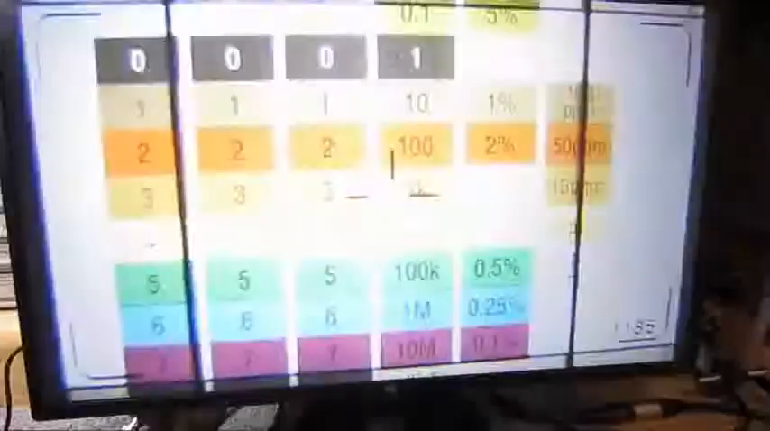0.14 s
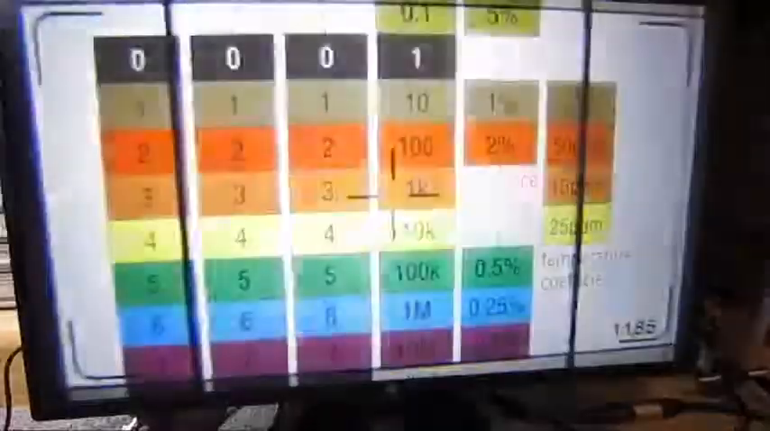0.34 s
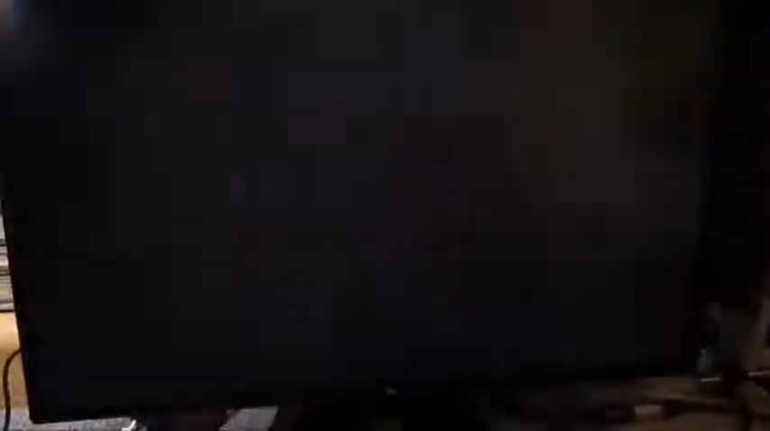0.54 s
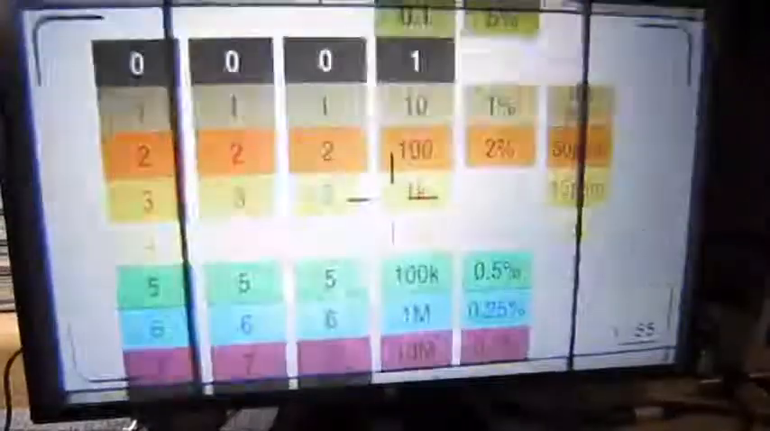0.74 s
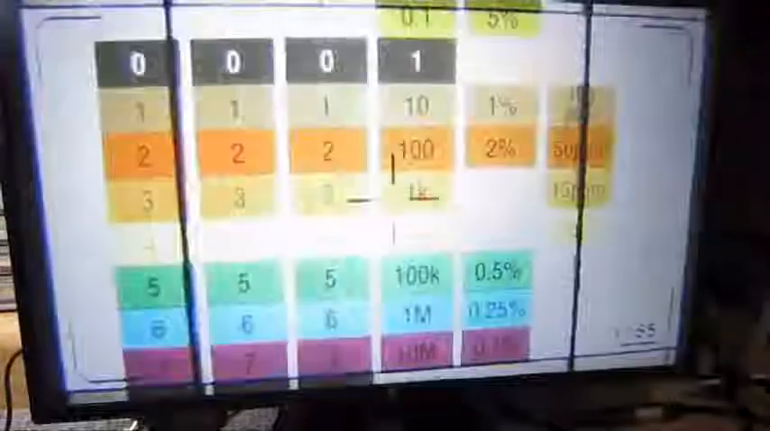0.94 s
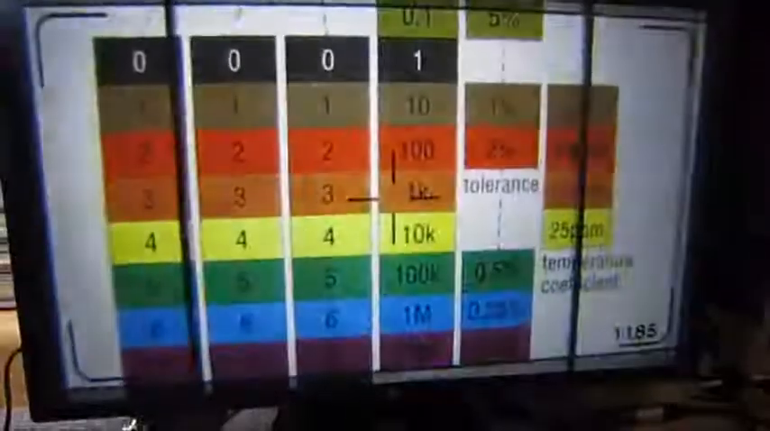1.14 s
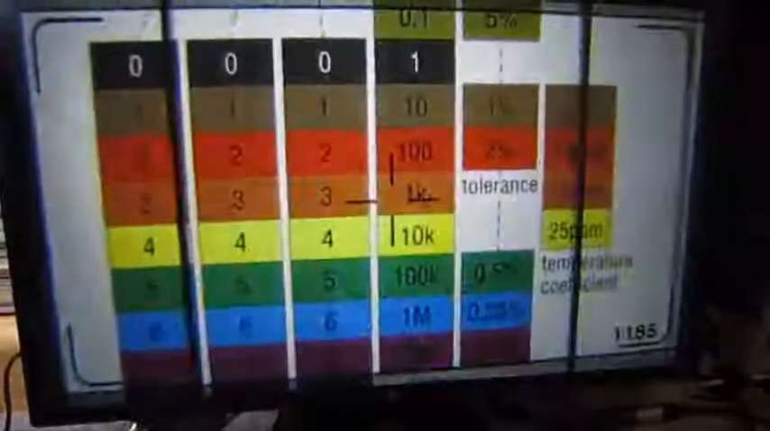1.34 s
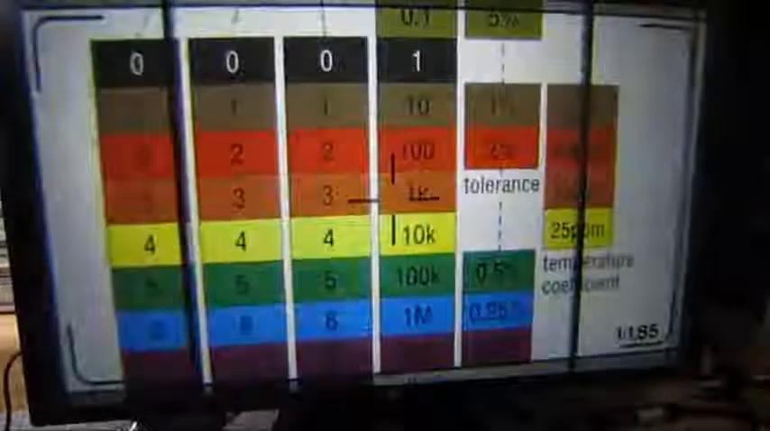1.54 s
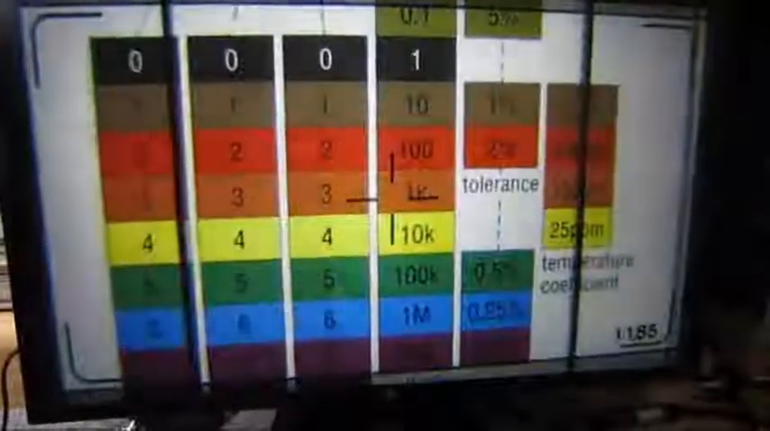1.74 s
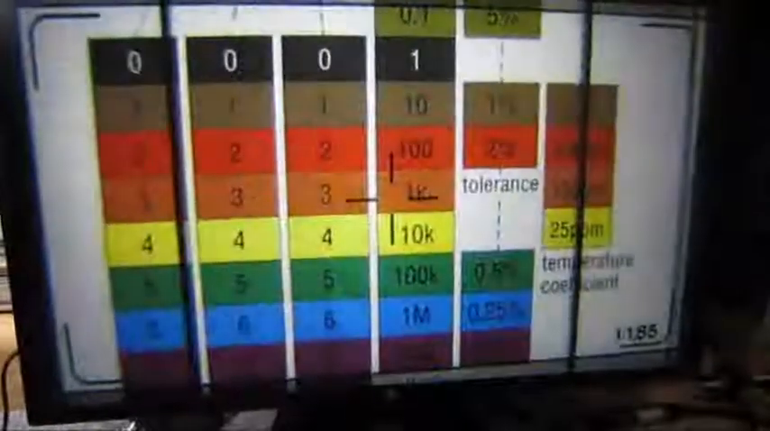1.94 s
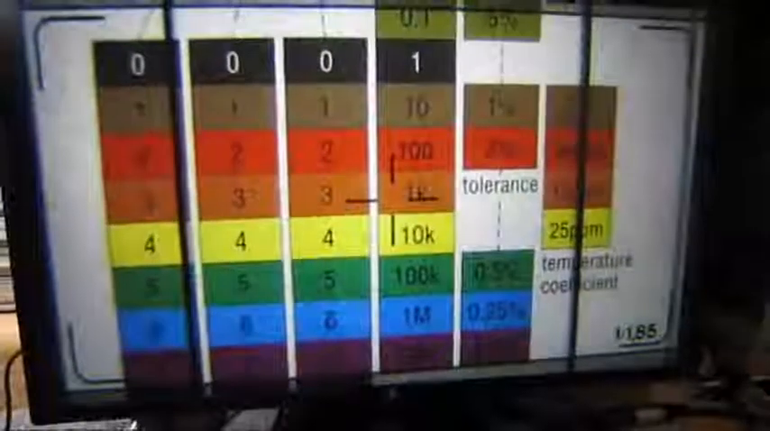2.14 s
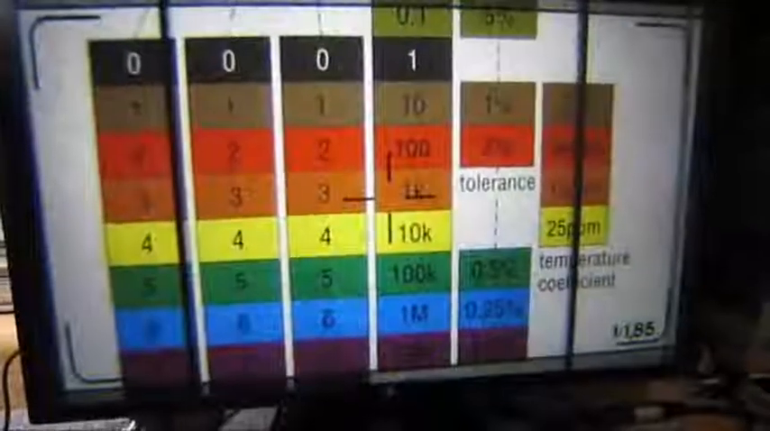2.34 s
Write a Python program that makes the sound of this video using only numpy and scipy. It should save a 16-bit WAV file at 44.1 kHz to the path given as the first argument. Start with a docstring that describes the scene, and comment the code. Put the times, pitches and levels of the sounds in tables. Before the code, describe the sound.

Five rapid rattly mechanical clicks from a small camera mechanism, then soft hum and hiss indoors

```python
"""A quiet room hums and hisses throughout, wide and partly out of phase between the two microphones.
Close on the left, a camera mechanism is already running: a faint last bounce and tick of an earlier
stroke, then five more strokes. Each is a cluster of small blows, chatter, rattle and a low thump; body
and metal parts ring as decaying sine waves, clicks and rattle are shaped noise, and a short room tail
follows. The mechanism stops before one second, leaving the hum and hiss."""
import sys
import numpy as np
from scipy import signal
from scipy.fft import rfft, irfft
from scipy.io import wavfile
from scipy.ndimage import uniform_filter1d

SR = 44100
rng = np.random.default_rng(int(sys.argv[2]) if len(sys.argv) > 2 else 0)


def put_to_file(sound):
    """Save the sound as 16-bit audio at rate SR, in the file named by the first command-line argument."""
    columns = np.atleast_2d(sound).T  # one column per channel
    safe = np.clip(columns, -1, 1)
    whole_steps = np.round(safe * 32767)
    wavfile.write(sys.argv[1], SR, whole_steps.astype(np.int16))


N = 105840  # length in samples: 2.4 s
# Right side: the shared sound, plus a part of its own
RIGHT_DB, RIGHT_OWN_DB = -10.5, -14.5
TREBLE_ABOVE_HZ = 2000  # where the treble settings of blows and rattles begin


def amp(db):
    """Turn decibels into a plain multiplier."""
    return 10 ** (np.asarray(db) / 20)


def evened(x):
    """Scale a signal to an RMS (average strength) of one."""
    return x / np.sqrt(np.mean(x ** 2) + 1e-20)


def read(points, hz):
    """Read a curve between its points, along a logarithmic pitch scale."""
    f, value = np.transpose(points)
    return np.interp(np.log(hz + 1), np.log(f + 1), value)


def add(mix, start_s, sound):
    """Lay a sound into the mix, cutting it at the end."""
    part = mix[:, round(start_s * SR):][:, :sound.shape[1]]
    part += sound[:, :part.shape[1]]


# How alike the two sides of the room noise are.
# Each row: frequency in Hz, likeness (1 the same, 0 unrelated, -1 opposite).
AIR_LIKENESS = [(30, -0.5), (60, -0.42), (100, -0.65), (300, -0.77), (900, -0.7), (1520, -0.63),
                (2600, -0.43), (5000, -0.07), (10000, -0.07)]
# How the room noise leans to one side. Each row: frequency in Hz, left minus right in dB.
AIR_LEAN = [(60, -2.5), (91, 4.5), (140, 1), (210, 1), (320, -1), (490, -0.5), (740, 1.5), (1130, 1.0),
            (1710, 1), (2600, 0.5)]
# The tone colour of the room noise. Each row: frequency in Hz, relative level in dB per Hz.
AIR_COLOUR = [(20, -17.5), (64, -6.5), (85, -8.5), (144, -7), (250, -7), (413, -9), (532, -11.5),
              (960, -16.5), (1600, -16.5), (2200, -23.5), (3050, -29), (4000, -34.5), (6000, -36.5),
              (8000, -40), (9500, -44.5)]
AIR_DB, AIR_TOP_HZ = -53, 9590  # overall RMS level, upper edge
AIR_PATCH_DB, AIR_SWELL_DB = 0.12, -0.49


def air():
    """Room noise, built from random frequency bins with drifting patches and a slow swell."""
    frames, hz = N // 512 + 5, np.fft.rfftfreq(2048, 1 / SR)
    a, b, c, d, patches = rng.standard_normal((frames, 1025, 5)).T
    # Smooth over neighbouring bins and moments
    patches = uniform_filter1d(patches, 20, 0)
    patches = evened(uniform_filter1d(patches, 6, 1))
    swell = evened(uniform_filter1d(rng.standard_normal(frames), 12))
    same = np.clip(read(AIR_LIKENESS, hz), -1, 1)[:, None]
    half_lean = amp(read(AIR_LEAN, hz)[:, None] / 2)
    left = a + 1j * b
    right = same * left + np.sqrt(1 - same ** 2) * (c + 1j * d)
    bins = np.array([left * half_lean, right / half_lean])
    colour = amp(read(AIR_COLOUR, hz)) / np.sqrt(1 + (hz / AIR_TOP_HZ) ** 40)
    bins *= colour[:, None] * amp(AIR_PATCH_DB * patches + AIR_SWELL_DB * swell)
    noise = signal.istft(bins, nperseg=2048, noverlap=1536)[1][:, :N]
    return amp(AIR_DB) * evened(noise)


# The wavering hum. Each row: frequency in Hz, left RMS level in dB, width in Hz,
# right side as a multiple of the left.
HUM_BANDS = [(59.46, -67.5, 2.1, 0.083), (208.2, -64.5, 26, 0.18)]


def hum():
    """Narrow bands of noise waver like unsteady tones, stronger on the left."""
    hz, out = np.fft.rfftfreq(N, 1 / SR), 0
    for centre_hz, db, width_hz, right in HUM_BANDS:
        spectrum = rfft(rng.standard_normal(N))
        spectrum = spectrum / (1 + (2 * (hz - centre_hz) / width_hz) ** 2)
        band = evened(irfft(spectrum, N))
        out = out + amp(db) * band * np.array([[1], [right]])
    return out


# t60 is the time in seconds for a sound to fall by 60 dB
ROOM_DB, ROOM_RIGHT_DB, ROOM_LOW_HZ = -12, -4.5, 245
ROOM_T60_S, ROOM_TREBLE_T60_S = 0.21, 0.23  # below and above about 2500 Hz
ROOM_TURN_S = 0.46  # half a cycle of the turn-taking between tails


def room(x):
    """Short noise tails echo the mechanism; three take turns so that the echo keeps changing."""
    t, out = np.arange(SR // 3) / SR, 0
    x = signal.lfilter(*signal.butter(N=2, Wn=ROOM_LOW_HZ, btype="high", fs=SR), x)
    for k in range(3):
        left = rng.standard_normal(len(t)) * (t > .004)  # the echo starts after 4 ms
        taps = np.array([left, amp(ROOM_RIGHT_DB) * left])
        low = signal.lfilter(*signal.butter(N=2, Wn=2500, fs=SR), taps)
        tail = low * amp(-60 * t / ROOM_T60_S)
        tail += (taps - low) * amp(-60 * t / ROOM_TREBLE_T60_S)
        tail /= np.linalg.norm(tail[0])
        turn = np.sqrt(2 / 3) * np.cos(np.pi * (np.arange(N) / SR / ROOM_TURN_S + k / 3))
        out = out + signal.fftconvolve((x * turn)[None], tail, axes=1)[:, :N]
    return amp(ROOM_DB) * out


# A light part ticks. Each row: start in seconds, left level in dB.
TICK_TIMES = [(0.001, -43.5), (0.103, -53), (0.266, -43), (.612, -36.5)]
LIGHT_HZ, LIGHT_T60_S = 1730, 0.087
CONTACT_S = 0.0004  # softness of a contact, shared with the blows


def tick(db):
    """A light part rings on one mode (its own pitch), rising quickly and dying away."""
    t = np.arange(SR // 8) / SR
    shape = (1 - np.exp(-t / CONTACT_S)) * amp(-60 * t / LIGHT_T60_S)
    ring = shape * np.sin(2 * np.pi * LIGHT_HZ * t)
    return amp([[db], [db + RIGHT_OWN_DB]]) * ring


# The housing thumps once a stroke. Each row: start in seconds, left peak level in dB.
THUMP_TIMES = [(0.22, -51), (0.443, -49.5), (0.614, -45), (0.783, -44), (0.941, -46)]
THUMP_HZ, THUMP_RISE_S, THUMP_T60_S, THUMP_RIGHT_DB = 142.6, 0.016, 0.11, -4.5


def thump(db):
    """A low mode of the housing swells and dies."""
    t = np.arange(SR // 4) / SR
    shape = (1 - np.exp(-t / THUMP_RISE_S)) * amp(-60 * t / THUMP_T60_S)
    wave = shape / shape.max() * np.sin(2 * np.pi * THUMP_HZ * t)
    return amp([[db], [db + THUMP_RIGHT_DB]]) * wave


# Loose parts rattle through each stroke. Each row: start in seconds, length in seconds before
# it fades, level in dB, treble boost in dB.
RATTLE_TIMES = [(.213, .04, -48, 0.0), (0.432, 0.049, -48, -4.5), (0.6, 0.022, -45.5, 3.5),
                (0.78, 0.029, -44.5, -1), (0.932, 0.028, -49.5, 2)]
# The tone colour of the rattle. Each row: frequency in Hz, relative level in dB.
RATTLE_COLOUR = [(200, -34), (400, 5), (600, -5), (1100, 5), (1800, -3), (2700, -6.5), (3400, -20.5),
                 (5300, -21), (7000, -26.5), (9000, -30), (11000, -47)]
RATTLE_PER_S, RATTLE_SPREAD_DB = 1400, 2  # average grains per second, unevenness of size
RATTLE_RISE_S, RATTLE_T60_S, GRAIN_T60_S = 0.001, 0.21, 0.0075


def rattle(length_s, db, treble_db):
    """Loose parts make dense short grains of noise; the right side adds a part of its own."""
    t = np.arange(SR // 4) / SR
    f, grain_t = np.fft.rfftfreq(1024, 1 / SR), np.arange(1024) / SR
    hits = (rng.random(len(t)) < RATTLE_PER_S / SR) * rng.choice([-1., 1.], len(t))
    hits *= amp(RATTLE_SPREAD_DB * rng.exponential(1, len(t)))
    # Each hit picks one of eight different grains
    kind, out = rng.integers(0, 8, len(t)), 0
    for k in range(8):
        grain = rng.standard_normal((2, 1024)) * amp(-60 * grain_t / GRAIN_T60_S)
        chosen = (hits * (kind == k))[None]
        out = out + signal.fftconvolve(grain, chosen, axes=1)[:, :len(t)]
    colour_db = read(RATTLE_COLOUR, f) + np.where(f > TREBLE_ABOVE_HZ, treble_db, 0)
    colour = signal.firwin2(511, f, amp(colour_db), fs=SR)
    near, own = evened(signal.oaconvolve(out, colour[None], "same"))
    fade = amp(db - 60 * np.maximum(t - length_s, 0) / RATTLE_T60_S)
    shape = (1 - np.exp(-t / RATTLE_RISE_S)) * fade
    return shape * np.array([near, amp(RIGHT_DB) * near + amp(RIGHT_OWN_DB) * own])


# The blows of the mechanism. Each row: start in seconds, left peak level in dB, then boosts in dB
# for the dull body modes, the main ring, the metal parts and the treble of the click.
BLOW_TIMES = [(0.002, -38.5, 1.5, -2.5, -2, 15), (0.214, -24.5, 4.5, 6.5, 0, 5),
              (0.218, -27.5, 0.0, 0, 10, 4), (0.233, -29, -2.5, -15, 3, -1), (0.238, -29.5, 1.5, 1, -5, 15),
              (0.245, -34, 7, -10, -8, 2), (0.268, -39, 10, 0.0, 0.0, 3), (0.431, -41.5, 2, -5, 2, 11),
              (0.436, -24.5, 4.5, 3.5, 8, 14), (0.444, -32, -12, -4, -15, -14),
              (0.447, -29.5, -4, -5, -4, -10), (0.458, -35, 0, -14, -5, 12),
              (0.467, -31.5, -1, -7.5, -4, 13), (0.605, -25.5, 11.5, 13.5, 9, -6),
              (0.606, -23, 1.5, 9.5, 12, 1), (0.612, -23.5, 2, -1.5, 9, 3),
              (0.616, -30.5, 6, -3.5, 15, -17), (0.627, -31, 2, 8.5, 5, -5), (0.632, -27.5, 7.5, 12, 11, 6),
              (0.643, -43, -5, -5, 2, 16), (0.779, -30.5, -2, -12, -11, -4), (0.782, -26.5, 3, -4.5, -7, 8),
              (0.791, -27.5, -9, -15, -4, -1), (0.802, -28, 1, 0.5, -13, 12),
              (0.811, -30.5, -1.5, -4.5, -8, 3), (0.93, -42, -15, -3, 0, 8), (0.937, -29, 3.5, -4.5, 6, 10),
              (0.941, -36, 4, -13, -16, 6), (0.946, -29.5, 4, -12, -6, 2), (0.952, -31, -1.5, 1, -7, 0),
              (0.964, -32.5, 0, -3, -5, 12)]
# The camera body's modes. Each row: frequency in Hz, relative level in dB, t60 in seconds.
BODY_MODES = [(356.8, -20, 0.23), (447, -2.5, 0.049), (513, -2.5, 0.045), (677.4, -5, 0.043),
              (770.3, -5, 0.065), (898, -10, 0.066), (1117, -2.5, 0.043), (1241, -12.5, 0.1),
              (1304, 1, 0.069), (1361, -1, 0.054), (1490, -40, 0.15), (1716, -3, 0.059), (1786, -11, 0.049),
              (2291, -18.5, 0.17), (2548, -15.5, 0.032), (2730, -20.5, 0.062), (2930, -30.5, 0.11)]
# The small metal parts' modes. Each row: frequency in Hz, relative level in dB, t60 in seconds.
METAL_MODES = [(5250, -31, 0.052), (5640, -38, .03), (6300, -44, 0.044), (6370, -34, .04),
               (7850, -61, 0.037), (9050, -38, 0.027), (9700, -39, 0.033), (10000, -56, 0.027),
               (10300, -42.5, 0.043), (11530, -46, 0.059), (12900, -46, 0.11)]
# The tone colour of the click in a blow. Each row: frequency in Hz, relative level in dB.
CLICK_COLOUR = [(150, -71), (350, 12), (1500, 3), (2600, -7), (3500, -20.5), (6000, -29), (9000, -36),
                (11000, -39.5), (13500, -65)]
DULL_BELOW_HZ, RING_HZ = 1000, (1260, 1400)
RISE_CYCLES, METAL_RISE_S = 0.94, 0.0019
MODE_SCATTER_DB, METAL_SCATTER_DB, DETUNE = 1, 5, 0.026  # random spread; detune is a fraction
CLICK_DB, CLICK_T60_S, CLICK_RISE_S = -2, 0.041, 0.0029
CHATTER_PER_S, CHATTER_DB, CHATTER_T60_S = 1700, -23, 0.12


def blow(db, dull_db, ring_db, metal_db, click_treble_db):
    """A soft contact and its chatter ring the modes; a second mix of modes reaches the right side."""
    t = np.arange(SR // 4) / SR
    hz, level, t60 = np.transpose(BODY_MODES + METAL_MODES)[:, :, None]
    metal = slice(len(BODY_MODES), None)
    level = level + np.where(hz < DULL_BELOW_HZ, dull_db, 0)
    level += np.where((hz > RING_HZ[0]) & (hz < RING_HZ[1]), ring_db, 0)
    luck = rng.standard_normal((len(hz), 3))
    # Low modes are detuned a little at random in each blow
    hz = hz * (1 + DETUNE * luck[:, 2:] * (hz < DULL_BELOW_HZ))
    level[metal] += metal_db + METAL_SCATTER_DB * luck[metal, 1:2]
    fade = amp(level + MODE_SCATTER_DB * luck[:, :1] - 60 * t / t60)
    rings = fade * np.sin(2 * np.pi * hz * t)
    rings *= 1 - np.exp(-t / (CONTACT_S + RISE_CYCLES / hz))
    rings[metal] *= 1 - np.exp(-t / METAL_RISE_S)

    f = np.fft.rfftfreq(len(t), 1 / SR)
    colour_db = read(CLICK_COLOUR, f) + np.where(f > TREBLE_ABOVE_HZ, click_treble_db, 0)
    noise = rfft(rng.standard_normal((2, len(t))))
    click = evened(irfft(noise * amp(colour_db), len(t)))
    click *= amp(CLICK_DB - 60 * t / CLICK_T60_S) * (1 - np.exp(-t / CLICK_RISE_S))

    near = rings.sum(0) + click[0]
    own = (-1.) ** np.arange(len(hz)) @ rings + click[1]  # every other mode upside down
    pair = np.array([near, amp(RIGHT_DB) * near + amp(RIGHT_OWN_DB) * own])

    hits = (rng.random(len(t)) < CHATTER_PER_S / SR) * rng.standard_normal(len(t))
    hits *= amp(CHATTER_DB - 60 * t / CHATTER_T60_S)
    hits[0] = 1  # the main contact
    pair = signal.fftconvolve(pair, hits[None], axes=1)
    return amp(db) / abs(pair[0]).max() * pair


def scene():
    """Place all the sounds of the mechanism, then add its echo, the room noise and the hum."""
    camera = np.zeros((2, N))
    for start_s, *settings in BLOW_TIMES:
        add(camera, start_s, blow(*settings))
    for start_s, *settings in RATTLE_TIMES:
        add(camera, start_s, rattle(*settings))
    for start_s, db in THUMP_TIMES:
        add(camera, start_s, thump(db))
    for start_s, db in TICK_TIMES:
        add(camera, start_s, tick(db))
    return camera + room(camera[0]) + air() + hum()


EDGE_HZ = 15000


def record(dry):
    """The recorder's band limit removes the highest treble."""
    low_pass = signal.firwin(511, EDGE_HZ, window=("kaiser", 9), fs=SR)
    return signal.oaconvolve(dry, low_pass[None], "same")


dry = scene()
out = record(dry)
put_to_file(out)
```